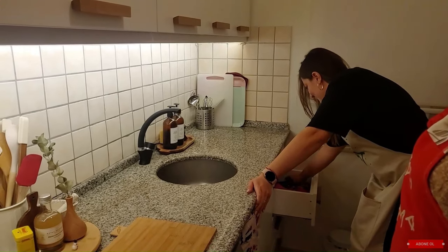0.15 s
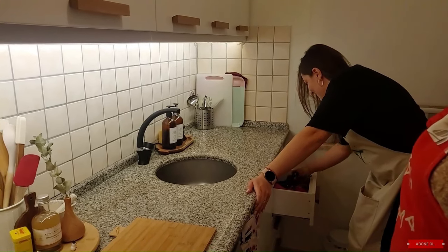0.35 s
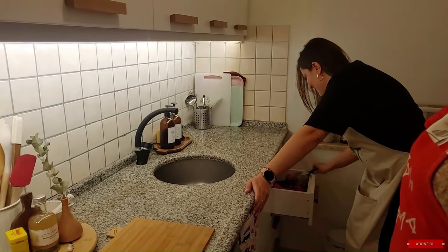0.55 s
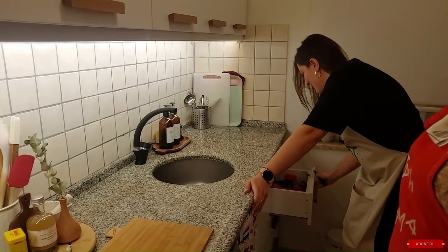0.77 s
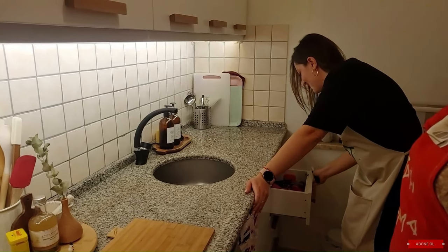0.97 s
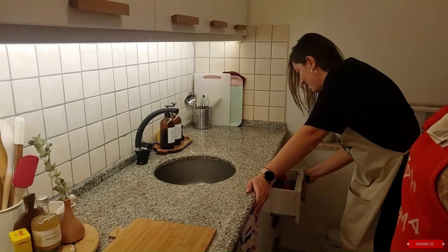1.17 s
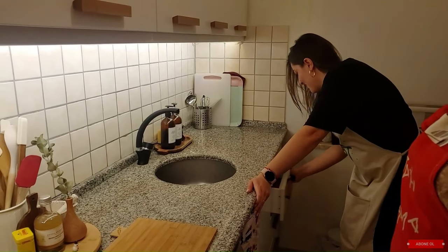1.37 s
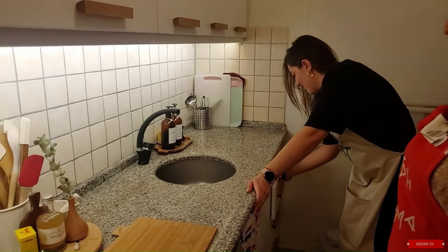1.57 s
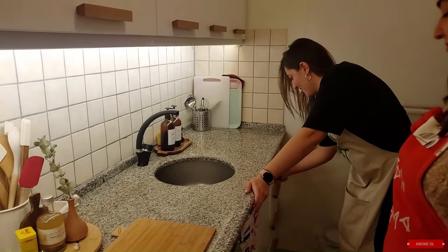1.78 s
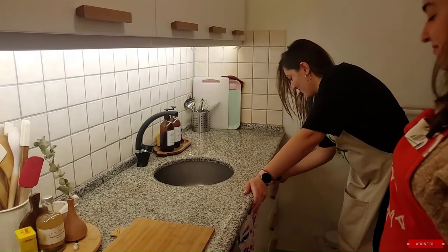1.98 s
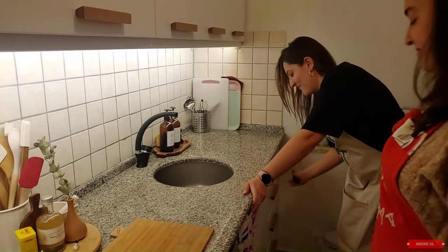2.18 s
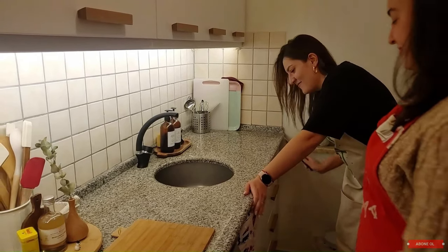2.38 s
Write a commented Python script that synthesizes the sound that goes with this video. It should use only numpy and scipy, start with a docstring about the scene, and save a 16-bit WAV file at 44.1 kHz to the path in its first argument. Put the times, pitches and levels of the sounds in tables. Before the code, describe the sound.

A drawer is searched and closed close by in a quiet kitchen. Hollow utensils rattle lightly, a metal one falls and rings briefly, then the drawer rumbles along its runners, knocks and shuts with a deep cabinet thud.

```python
"""Kitchen, at a drawer. A hand rummages among hollow utensils and drops a metal one; a high metallic ring
wavers, then drops sharply and fades. The drawer rolls in on its runners in two pushes, creeps, and bangs
shut; the cabinet booms at each jolt. Rummaging and rolling are random contacts exciting resonances;
blows are noise bursts plus struck modes; booms, notes and rattle are decaying sines.
A gate lowers quiet passages."""
import sys
import numpy as np
from scipy import signal
from scipy.fft import rfft, irfft
from scipy.io import wavfile

SR = 44100
rng = np.random.default_rng(int(sys.argv[2]) if len(sys.argv) > 2 else 0)


def unload_wav(signal):
    """Save mono or channel-first audio to the path in sys.argv[1] as 16-bit WAV at rate SR, clipped to [-1, 1]."""
    wavfile.write(
        sys.argv[1],
        SR,
        np.round(np.clip(np.atleast_2d(signal).T, -1, 1) * 32767).astype(np.int16),
    )


N = 107427

# room tone: (frequency [Hz], density [dB])
ROOM_SPECTRUM = [(18, -49.5), (30, -17.5), (80, 4.5), (135, -15), (245, -8.5), (2000, -40), (2120, -33),
                 (2780, -31.5), (3000, -44), (3900, -66.5), (6600, -120)]
# hand stirring: (time [s], 4 band levels low to high [dB], rustle level [dB])
STIR_LEVELS = [(0.005, -56, -49.5, -75, -65, -103), (0.105, -77, -59.5, -62, -68, -103),
               (.17, -59, -55, -49, -70, -100), (.182, -57, -53.5, -46.5, -47.5, -57),
               (0.236, -57.5, -53, -50, -42, -56), (.275, -61.5, -73, -62, -56, -64),
               (0.325, -68, -79, -69, -58, -89), (.385, -66, -66, -50.5, -56, -100),
               (0.441, -55.5, -66, -61, -69.5, -100)]
# hollow contents and tray: (frequency [Hz], level [dB], t60 [s])
CONTENT_MODES = [(213, -8.5, 0.027), (291, -11, 0.13), (483.4, -19.5, 0.17), (526, -6, 0.033),
                 (600, -11, .08), (657, -15.5, .08), (767, -9, 0.063), (813, -4.5, 0.061),
                 (1023, -7.5, 0.097), (1170, -4.5, 0.027), (1492, -4, 0.035), (2100, -2, 0.017),
                 (2205, -9.5, 0.025), (2430, -19, 0.06), (2822, -18, 0.049)]
# treble of the stirring: (frequency [Hz], density [dB])
RUSTLE_SPECTRUM = [(1760, -28.5), (3000, 14.5), (3510, -17), (4140, -19.5), (4750, 3), (5340, -32.5),
                   (6840, -1), (8900, -4.5), (10000, -19.5), (12800, -16.5), (15500, 1.5)]
# single utensils: (time [s], peak [dB], pitch [Hz], swell [s], t60 [s])
UTENSIL_NOTES = [(.005, -42.5, 490, 0.032, 0.18), (0.042, -46.5, 1233, 0.024, 0.014),
                 (0.046, -39.5, 538, 0.014, 0.1), (.112, -31.5, 754, 0.009, 0.059),
                 (.118, -33.5, 507.6, 0.0095, 0.15), (0.141, -29, 522.4, 0.011, 0.12),
                 (.145, -35.5, 590, 0.0067, 0.23), (.173, -42, 1930, 0.0074, 0.046),
                 (.178, -53.5, 2386, 0.013, 0.17), (.19, -38.5, 826, 0.013, 0.17),
                 (.23, -35, 1310, 0.01, 0.03), (.232, -40, 1968, 0.0024, 0.11),
                 (.232, -32.5, 875, 0.0048, 0.037), (.35, -51, 2015, 0.027, 0.032),
                 (.447, -14, 764, 0.0036, 0.096), (.447, -17, 640, 0.0027, 0.07),
                 (.469, -11.5, 540, 0.0052, 0.067)]
# two ticks, then the fall: (time [s], level [dB], tilt [dB/octave])
TRAY_HITS = [(.177, -35.5, 1.5), (.235, -33.5, 3), (.446, -16, 2.5), (.453, -8, 0), (.470, -14.5, 3.5),
             (.475, -7.5, -6)]
# noise of those hits: (frequency [Hz], density [dB])
TRAY_SPECTRUM = [(88, -48), (150, -23.5), (217, -24.5), (436, -12), (540, -4.5), (812, -8), (1370, -24),
                 (1830, -12), (3220, -29.5), (7410, -31), (15500, -49.5)]
# dry tail of the tray: (frequency [Hz], t60 [s])
TRAY_DECAY = [(300, 0.23), (8000, 0.21)]
# cabinet: (time [s], peak [dB], pitch [Hz], swell [s], t60 [s])
CABINET_BOOMS = [(0.406, -23, 91.3, 0.031, 0.16), (.63, -53, 53.9, 0.015, 0.24), (1.06, -40, 50, .04, .4),
                 (.968, -18, 92.7, 0.031, 0.22), (1.183, -6, 89.3, 0.04, 0.16),
                 (1.189, -21.5, 55, .02, 0.37), (1.367, -15.5, 104, 0.015, 0.089),
                 (1.427, -17, 89.4, 0.02, 0.37), (1.513, -7, 89.6, 0.047, 0.31),
                 (1.568, -17.5, 56, 0.0207, 0.12), (1.591, -6.5, 84.7, 0.028, 0.16),
                 (1.632, -16.5, 56.8, 0.01, 0.16), (1.725, -21.5, 89.8, 0.018, .25),
                 (1.759, -26, 60.6, 0.033, 0.24), (1.85, -17, 87, 0.048, 0.14),
                 (1.87, -25.5, 57, 0.043, .2), (1.933, -5, 61, .03, 0.28), (1.962, -10, 90.6, 0.018, 0.38),
                 (1.978, -12, 52.35, 0.092, 0.27), (2.261, -40.5, 56, 0.023, .3)]
# metal utensil: (frequency [Hz], level [dB], t60 [s], swell [s])
METAL_MODES = [(7111, -37, 2.5, .075), (8877, -54, .7, .006), (10880, -39, .2, .004)]
# drawer rolling: (time [s], 6 band levels low to high [dB])
ROLL_LEVELS = [(0.96, -48.5, -77.5, -99, -105, -102, -100), (0.982, -44.5, -82, -98.5, -93, -93, -90),
               (1.096, -49.5, -42, -53.5, -70, -91, -79), (1.175, -37.5, -29.5, -31.5, -43.5, -53.5, -73),
               (1.266, -27.5, -28.5, -21.5, -35.5, -43.5, -50),
               (1.336, -37.5, -30.5, -35, -45.5, -50.5, -53.5), (1.37, -29.5, -27.5, -27.5, -39, -48, -57),
               (1.446, -20.5, -22, -21, -27, -37.5, -45.5), (1.528, -17, -19, -21, -33.5, -40.5, -39),
               (1.562, -19.5, -23.5, -26, -34.5, -49.5, -48.5), (1.59, -13.5, -20, -21.5, -26, -30.5, -36),
               (1.64, -22.5, -30.5, -31.5, -35, -38, -42.5), (1.72, -35, -45.5, -46, -48, -57.5, -70.5),
               (1.804, -31, -47, -46.5, -58, -83, -83), (1.89, -35.5, -44, -58.5, -62.5, -86, -88),
               (1.912, -30.5, -34.5, -46, -47.5, -72.5, -72.5)]
# runner noise: (frequency [Hz], density [dB])
ROLL_SPECTRUM = [(76, -32.5), (130, -7.5), (231, 5.5), (361, -7.5), (486, -1), (666, -2.5), (914, -7.5),
                 (1180, -6.5), (1920, -15), (4350, -38.5), (5960, -48.5), (7450, -47), (11000, -65),
                 (22000, -120)]
# runner resonances and dips: (frequency [Hz], width [Hz], gain [dB])
RUNNER_PEAKS = [(900, 300, 7), (1330, 200, -8), (1720, 200, 11), (2400, 300, -5), (3020, 200, 11),
                (3500, 250, -7), (4550, 300, 9), (7450, 400, 12), (9000, 500, 6)]
# drawer box: (frequency [Hz], level [dB], t60 [s])
BOX_MODES = [(145.3, 7.5, 0.062), (183, 2, 0.05), (226.7, -5, 0.17), (315.5, -6, 0.18), (469, -13, 0.025),
             (583.7, -0.5, 0.023), (696, -10, 0.26), (802.6, -9, 0.046), (972, -11, 0.28),
             (1033, -12, 0.14), (1446, -17.5, 0.11), (1620, -17.5, 0.17), (2020, -20, 0.08)]
# drawer front and bottom: (time [s], peak [dB], pitch [Hz], swell [s], t60 [s])
PANEL_NOTES = [(.975, -28, 188.6, 0.032, 0.17), (1.148, -22, 251.4, 0.037, 0.11),
               (1.39, -17.5, 454, 0.029, 0.54), (1.507, -10, 230, 0.017, 0.16),
               (1.597, -12.5, 229.4, 0.045, 0.15), (1.83, -37, 704, 0.014, 0.23),
               (1.94, -4, 317.6, 0.012, 0.07), (1.947, -14.5, 142.1, 0.013, 0.33),
               (2.272, -55, 139.5, 0.034, 0.27)]
# box knocks, last four the shutting: (time [s], level [dB], tilt [dB/octave])
BOX_HITS = [(1.523, 3.5, 1), (1.611, 1.5, 3.5), (1.918, 1.5, 0), (1.9295, 6.5, 0.5), (1.939, -7.5, 4.55),
            (1.947, -6.5, -6)]
# noise of those knocks: (frequency [Hz], density [dB])
KNOCK_SPECTRUM = [(76, -31.5), (130, -1.5), (225, -5.5), (317, -5), (559, -1.5), (816, -8.5), (1000, -12.5),
                  (1410, -13), (3070, -28.5), (9210, -55), (12000, -79.5), (15600, -92.5), (22000, -120)]
# tail in cabinet and room: (frequency [Hz], t60 [s])
CABINET_DECAY = [(130, 0.46), (500, 0.28), (2000, .24), (6000, .2), (15000, 0.12)]
# loose part: (time [s], peak [dB], pitch [Hz], swell [s], t60 [s])
RATTLE_NOTES = [(1.575, -6.5, 564, 0.0073, 0.043), (1.571, -26.5, 2300, .01, .08),
                (1.573, -9, 1362, 0.018, 0.053), (1.58, -27.5, 3210, 0.022, .05),
                (1.62, -22, 1367, 0.012, 0.097), (1.917, -20.5, 1790, 0.0027, .06),
                (1.927, -8, 690, 0.0023, 0.045), (1.918, -36, 3800, 0.0045, 0.045)]

THIRD_OCTAVES_HZ = 120 * 2 ** np.arange(0, 7.5, 1 / 3)
TIME_S = np.arange(N) / SR


def amp(db):
    return 10 ** (np.asarray(db) / 20)


def unit_rms(x):
    return x / np.sqrt(np.mean(x ** 2) + 1e-20)


def soft(x, hz):
    """Two one-pole low-passes."""
    r = np.exp(-2 * np.pi * hz / SR)
    return signal.lfilter([(1 - r) ** 2], [1, -2 * r, r * r], x)


def wander(hz):
    return unit_rms(soft(rng.standard_normal(N), hz))


def level_curves(rows):
    times_s, *columns = np.transpose(rows)
    return [np.interp(TIME_S, times_s, db, left=-120, right=-120) for db in columns]


def at_hz(points, hz):
    points_hz, values = np.transpose(points)
    return np.interp(np.log(hz), np.log(points_hz), values)


def band(x, low_hz, high_hz, order=2):
    return signal.sosfilt(signal.butter(order, [low_hz, high_hz], "band", fs=SR, output="sos"), x)


def colour(x, spectrum, peaks=()):
    """Impose a spectrum and resonances; rms 1."""
    hz = np.fft.rfftfreq(N, 1 / SR) + 1
    peaks_db = sum(db / (1 + (2 * (hz - mid_hz) / width_hz) ** 2) for mid_hz, width_hz, db in peaks)
    return unit_rms(irfft(rfft(x) * amp(at_hz(spectrum, hz) + peaks_db), N))


def ring(x, hz, t60_s):
    r, w = amp(-60 / (t60_s * SR)), 2 * np.pi * hz / SR
    return signal.lfilter([0, np.sin(w)], [1, -2 * r * np.cos(w), r * r], x + 1e-18)


def contacts(per_s, spread_db):
    """Random impulses of uneven size."""
    occurs = rng.random(N) < per_s / SR
    size = amp(spread_db * np.minimum(rng.exponential(1, N), 5))
    return occurs * size * rng.choice([-1, 1], N)


def body(force, modes, wander_db=4):
    """Driven modes, each coming and going as the contacts move; rms 1."""
    return unit_rms(sum((-1) ** k * amp(db + wander_db * wander(hz=8)) * unit_rms(ring(force, hz, t60_s))
                        for k, (hz, db, t60_s) in enumerate(modes)))


def shape_bands(x, edges_hz, levels_db):
    return sum(soft(amp(db), 150) * unit_rms(band(x, low, high, order=4))
               for low, high, db in zip(edges_hz, edges_hz[1:], levels_db))


def tones(rows):
    """Sines that swell smoothly and die."""
    out = np.zeros(N)
    for start_s, db, hz, swell_s, t60_s in rows:
        t = np.maximum(TIME_S - start_s, 0)
        rise = np.sin(np.pi / 2 * np.minimum(t / swell_s, 1)) ** 2
        decay = amp(db - 60 * np.maximum(t - swell_s, 0) / t60_s)
        out += rise * decay * np.sin(2 * np.pi * hz * t)
    return out


def blows(hits, spectrum, modes, decay, ring_db, crack_t60_s=0.03, tail_db=-5, rise_s=0.0015):
    """Noise crack and tail per third octave, plus struck modes."""
    times_s, db, tilt_db = np.transpose(hits)
    onsets = (times_s * SR).astype(int)
    noise = colour(rng.standard_normal(N), spectrum)
    bursts, rings = np.zeros((2, N))
    for low, high in zip(THIRD_OCTAVES_HZ, THIRD_OCTAVES_HZ[1:]):
        hz, force = np.sqrt(low * high), np.full(N, 1e-18)
        force[onsets] = amp(db - 9 + tilt_db * np.log2(hz / 700))
        crack, tail = [signal.lfilter([1], [1, -amp(-60 / (t60_s * SR))], force)
                       for t60_s in (crack_t60_s, at_hz(decay, hz))]
        bursts += band(noise, low, high) * soft(crack + amp(tail_db) * tail, 1 / (2 * np.pi * rise_s))
    for (hz, mode_db, t60_s), scatter_db in zip(modes, rng.normal(0, 0.97, (len(hits), len(modes))).T):
        force = np.zeros(N)
        force[onsets] = amp(db + ring_db + mode_db + scatter_db + tilt_db * np.log2(hz / 700))
        rings += ring(force, hz, t60_s)
    return bursts + band(soft(rings, hz=3000), 180, 12000)  # soft: finite contact time


def room_tone(level_db=-67):
    """Steady low noise."""
    return amp(level_db) * colour(rng.standard_normal(N), ROOM_SPECTRUM)


def rummage():
    """Contents chatter and rustle under the hand."""
    force = contacts(per_s=400, spread_db=2.0)
    *bands_db, rustle_db = level_curves(STIR_LEVELS)
    rustle = colour(force + 1.2 * rng.standard_normal(N), RUSTLE_SPECTRUM)
    chatter = shape_bands(body(force, CONTENT_MODES), [200, 400, 680, 1100, 3500], bands_db)
    return chatter + soft(amp(rustle_db), 150) * unit_rms(band(rustle, 3500, 15800))


def utensil_notes():
    """Hollow utensils ring when nudged or struck."""
    return tones(UTENSIL_NOTES)


def tray_hits():
    """The contents tick twice, then the dropped utensil hits the tray."""
    return blows(TRAY_HITS, TRAY_SPECTRUM, CONTENT_MODES, TRAY_DECAY, ring_db=-11)


def cabinet_booms():
    """Jolts ring the cabinet's low modes."""
    return tones(CABINET_BOOMS)


def metal_ring(start_s=0.449, drop_s=0.618, drop_db=15, ramp_s=0.02, fade_db_per_s=130, waver_db=1.5):
    """The utensil's high metallic ring wavers, then drops sharply and fades."""
    t = np.maximum(TIME_S - start_s, 0)
    since_drop_s = np.maximum(TIME_S - drop_s, 0)
    partials = sum(amp(db - 60 * t / t60_s) * np.minimum(t / swell_s, 1) * np.sin(2 * np.pi * hz * t)
                   for hz, db, t60_s, swell_s in METAL_MODES)
    loss_db = drop_db * np.minimum(since_drop_s / ramp_s, 1) + fade_db_per_s * since_drop_s
    return partials * amp(waver_db * wander(hz=40) - loss_db)


def roll(box_db=-3):
    """Dense runner contacts, heard direct and through the box."""
    force = contacts(per_s=4000, spread_db=2.2)
    direct = colour(force, ROLL_SPECTRUM, RUNNER_PEAKS)
    box = amp(box_db) * body(force, BOX_MODES)
    return shape_bands(direct + box, [150, 400, 750, 1300, 2200, 3500, 14000], level_curves(ROLL_LEVELS))


def panel_notes():
    """Drawer front and bottom ring as it moves."""
    return tones(PANEL_NOTES)


def box_knocks():
    """The box knocks twice, then bangs shut."""
    return blows(BOX_HITS, KNOCK_SPECTRUM, BOX_MODES, CABINET_DECAY, ring_db=-24.5)


def rattle():
    """Something loose rings as the second push ends and at the shutting."""
    return tones(RATTLE_NOTES)


def scene():
    utensils = rummage() + utensil_notes() + metal_ring() + tray_hits()
    drawer = cabinet_booms() + roll() + panel_notes() + box_knocks() + rattle()
    return (room_tone() + utensils + drawer)[None]


def record(dry, hiss_db=-81.5, gate_db=-57.5, knee_db=8, depth_db=4.75, follow_hz=24, ceiling=1.05):
    """Faint hiss, soft gate, rounded peaks, 16 kHz low-pass."""
    r = np.exp(-2 * np.pi * follow_hz / SR)
    level_db = 10 * np.log10(signal.lfilter([1 - r], [1, -r], dry ** 2 + 1e-12))
    opening = np.exp(np.clip((level_db - gate_db) / knee_db, -30, 30)) / 2
    gated = (dry + amp(hiss_db) * rng.standard_normal(dry.shape)) * amp(-depth_db / (1 + opening))
    rounded = gated / (1 + (gated / ceiling) ** 4) ** (1 / 4)
    return signal.sosfilt(signal.cheby2(20, 60, 16000, fs=SR, output="sos"), rounded)


dry = scene()
out = record(dry)
unload_wav(out)
```